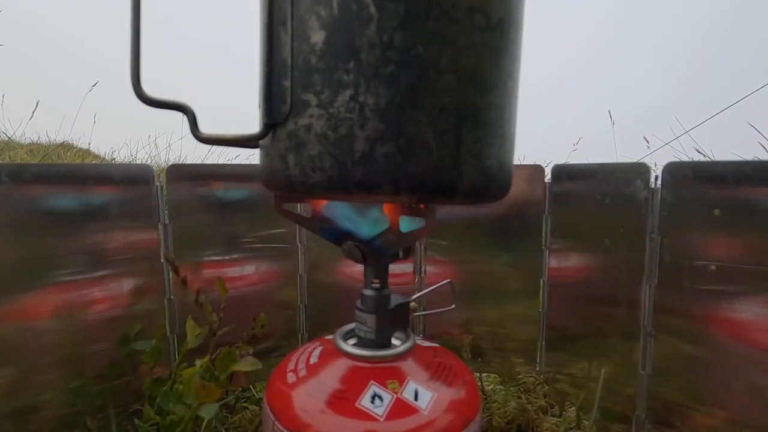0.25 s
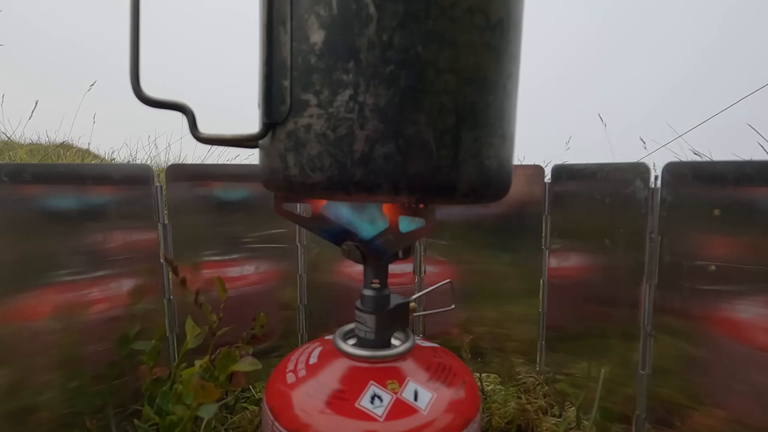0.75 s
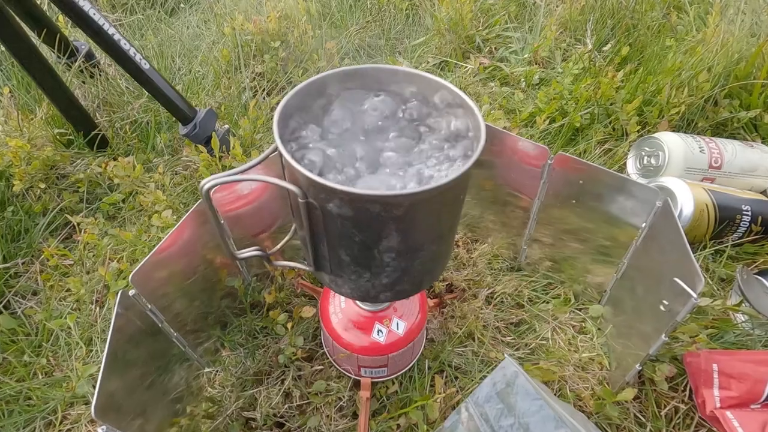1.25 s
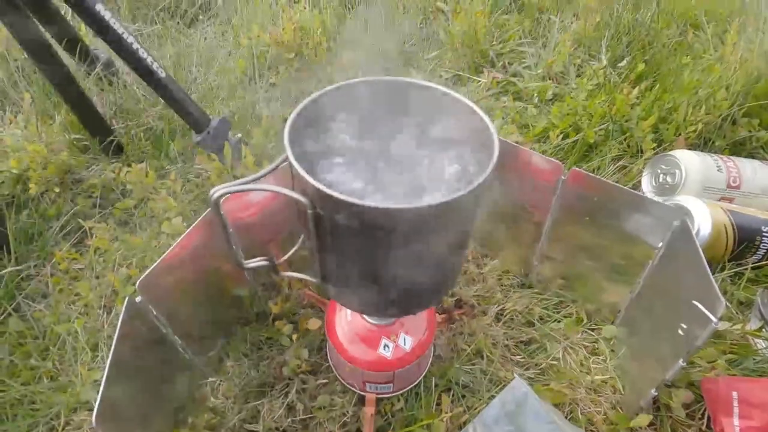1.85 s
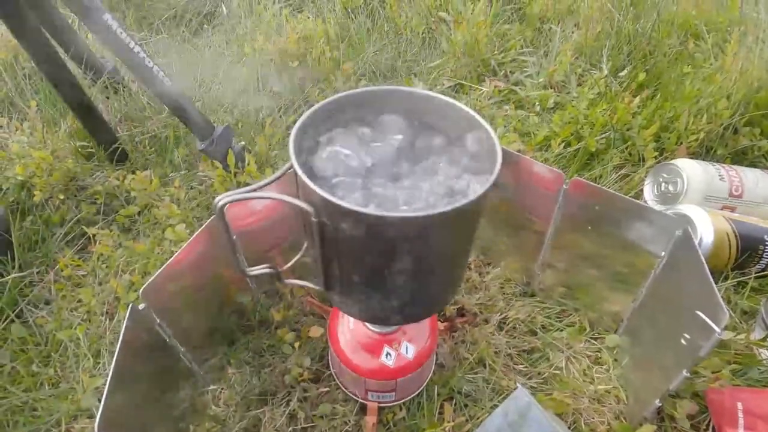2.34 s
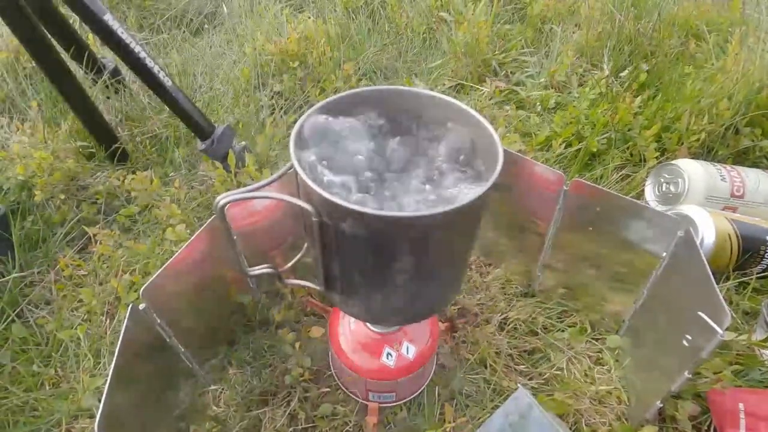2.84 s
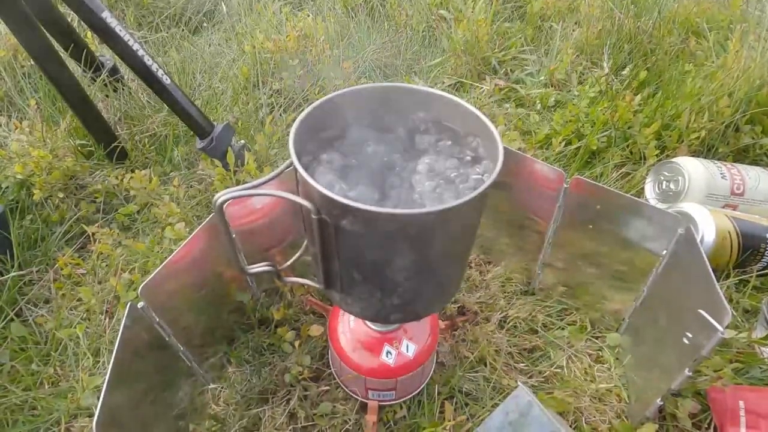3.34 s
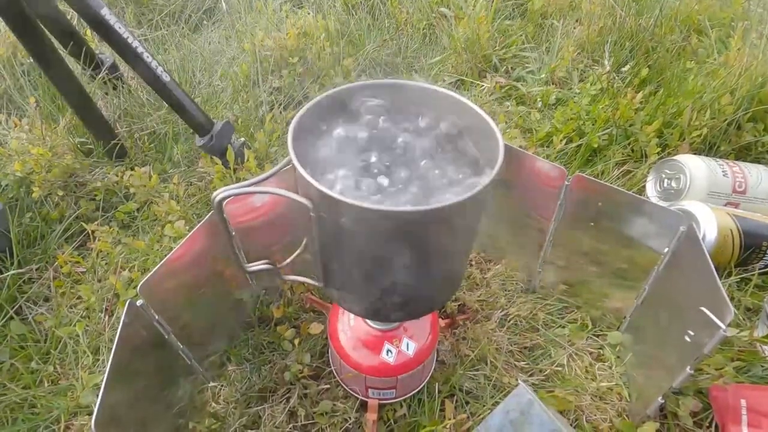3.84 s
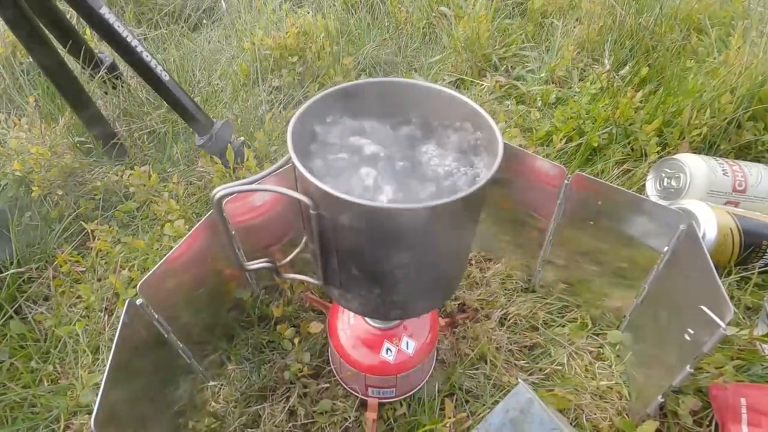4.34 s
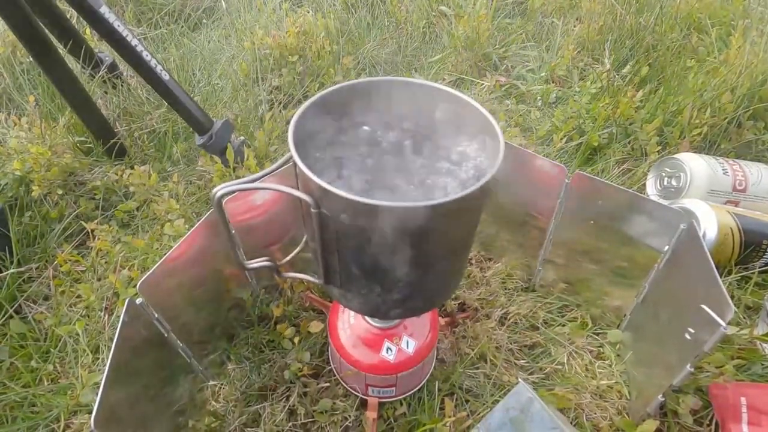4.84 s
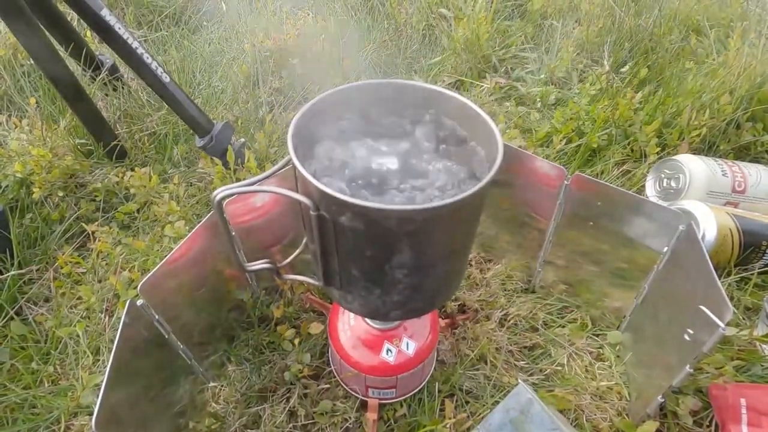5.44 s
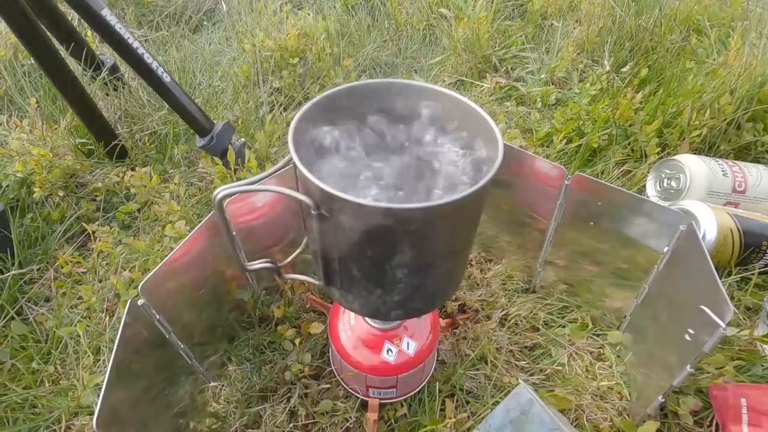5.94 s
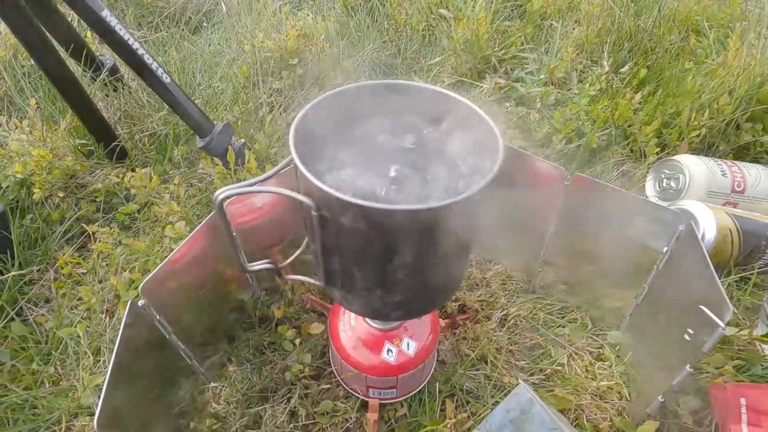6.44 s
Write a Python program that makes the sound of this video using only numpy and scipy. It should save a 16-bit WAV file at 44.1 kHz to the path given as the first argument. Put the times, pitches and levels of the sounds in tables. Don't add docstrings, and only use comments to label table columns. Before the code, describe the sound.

Close gas flame roar and hiss stop abruptly, then slowly rise again over bubbling water, with wind knocking the roar out twice.

```python
import sys
import numpy as np
from scipy import signal
from scipy.fft import rfft, irfft, next_fast_len
from scipy.io import wavfile

SR = 44100
rng = np.random.default_rng(int(sys.argv[2]) if len(sys.argv) > 2 else 0)


def wav_out(sig):
    wavfile.write(sys.argv[1], SR, np.round(np.clip(np.atleast_2d(sig).T, -1, 1) * 32767).astype(np.int16))


def rack_gain(trim_db):
    fader = np.asarray(trim_db, float)
    return 10 ** (fader / 20)


N = 294588
CUT_S, CUT_TAIL_S, RETURN_S = 1.2055, 0.0081, 1.29
RUMBLE_TOP_HZ = 337


def table(rows, at, scale=np.asarray):
    first, *columns = np.transpose(rows)
    return [np.interp(scale(at), scale(first), column) for column in columns]


def rms_one(x):
    return x / np.sqrt(np.mean(x ** 2) + 1e-20)


def drift(size, rate_hz):
    points = rng.standard_normal(int(size / SR * rate_hz * 2) + 4)
    smooth = rms_one(signal.resample(points, size // 32 + 2))
    return np.interp(np.arange(size) / 32, np.arange(len(smooth)), smooth)


def turbulence(size, colour, low_hz, high_hz, side, lean, flicker_db, patchy_db, count):
    padded = next_fast_len(size)
    hz = np.maximum(np.arange(padded // 2 + 1) * SR / padded, 1)
    level_db = table(colour, hz, np.log)[0] - 200 * (hz > colour[-1][0])
    mid, other = rfft(rng.standard_normal((2, padded))) * rack_gain(level_db)
    tilt = np.tanh(table(lean, hz, np.log)[0] * np.log(10) / 40)
    apart = rack_gain(table(side, hz, np.log)[0]) * other + tilt * mid
    place = (count + 1) * np.log(hz / low_hz) / np.log(high_hz / low_hz)
    together_db = flicker_db * (drift(size, 7.0) + 1.23 * drift(size, 45.0))
    out = 0
    for k in range(1, count + 1):
        window = np.cos(np.pi / 2 * np.clip(place - k, -1, 1)) ** 2
        band = irfft(np.array([mid, apart]) * window, padded)[:, :size]
        out = out + band * rack_gain(together_db + patchy_db * drift(size, 14.0))
    return out / np.sqrt(np.mean(out[0] ** 2))


def narrow_noise(hz, width_hz):
    low = signal.butter(2, width_hz / 2, fs=SR, output="sos")
    slow = signal.sosfilt(low, rng.standard_normal((2, 2, len(hz))))
    phase = 2 * np.pi * np.cumsum(hz) / SR
    mid, apart = slow[0] * np.cos(phase) + slow[1] * np.sin(phase)
    return np.array([rms_one(mid), rms_one(apart) * rack_gain(-10.0)])


def through(x, shield):
    padded = next_fast_len(N)
    hz = np.arange(padded // 2 + 1) * SR / padded
    level_db = sum(peak_db * np.exp(-((hz - at_hz) / width_hz) ** 2) for at_hz, width_hz, peak_db in shield)
    return irfft(rfft(x, padded) * rack_gain(level_db), padded)[:, :N]


# start t/s, length t/s, loss of
# roar level/dB, loss of rumble as a multiple of that
GUSTS = [(1.597, .08, 11, 0.16), (1.73, .1, 8, 0.2), (1.82, .1, 8, .5), (2.915, .03, 8, 0.36),
         (2.975, .015, 11, .1), (3.017, 0.21, 19.5, 0.24), (3.153, .07, 3, 1.7), (3.35, .02, 2.5, 1.4),
         (3.625, 0.0301, 2, 4.0), (4.309, .03, 3.5, 0), (4.538, .025, 14.5, 0.18), (4.608, 0.016, 6.5, 0.2),
         (4.729, .19, 26, 0.51), (4.988, .035, 23.5, 0.56), (5.05, 0.044, 10, 0), (5.11, .09, 11.5, 0.12),
         (5.155, .04, 0.5, 3.0), (5.374, .03, .5, 9.0), (5.674, .06, 3, 0.4)]


def flame_bend():
    attack_s, release_s, edge_per_length, settle_s = 0.023, 0.027, 0.17, .09
    t, roar, rumble = np.arange(N) / SR, 0, 0
    for s, length_s, loss_db, share in GUSTS:
        edge_s = edge_per_length * length_s
        corners = np.cumsum([s - attack_s, attack_s + edge_s, length_s - edge_s * .99, release_s + edge_s])
        bent = loss_db * np.interp(t, corners, [0, 1, 1, 0])
        roar, rumble = roar + bent, rumble + share * bent
    r = np.exp(-1 / (settle_s * SR))
    return roar, rumble, signal.lfilter([1 - r], [1, -r], roar)


# t/s, level/dB
FLAME = [(0.0, -24.5), (1.2, -24.5), (1.29, -84), (1.33, -65), (1.53, -44.5), (2.07, -44.5), (2.88, -39),
         (3.41, -33.5), (3.7, -31.5), (4.3, -30), (5.45, -27.5), (6.15, -27.5), (6.68, -28)]
# t/s, level/dB
JET = [(1.3, 2), (1.53, -1), (2.0, 0.5), (2.4, 0.5), (2.9, 1.5), (3.3, 0.5), (3.5, 2), (3.8, 0), (4.4, .5),
       (4.68, -0.5), (5.2, 1), (5.5, 2.5), (5.9, 3.5), (6.1, 5), (6.3, 3.5), (6.68, 4)]


def follower(rule):
    offset_db, growth, sudden, lingering, blown = rule
    reference_db = -25.5
    t, (roar, _, slow) = np.arange(N) / SR, flame_bend()
    grown_db = growth * (table(FLAME, t)[0] - reference_db) + blown * table(JET, t)[0]
    return reference_db + offset_db + grown_db - sudden * roar - lingering * slow


def burner(levels_db, start, stop, flame, jet, side, lean):
    size = stop - start
    rumble_db, roar_db, hiss_db = np.array(levels_db)[:, start:stop]
    place = (side, lean)
    rumble = turbulence(size, flame, 66.2, RUMBLE_TOP_HZ * 1.258, *place, flicker_db=0.59, patchy_db=1.5, count=3)
    roar = turbulence(size, flame, RUMBLE_TOP_HZ * 0.76, 2010, *place, flicker_db=0.22, patchy_db=-0.47, count=4)
    hiss = turbulence(size, jet, 1260, 17800, *place, flicker_db=0.49, patchy_db=0.76, count=10)
    out = np.zeros((2, N))
    out[:, start:stop] = rack_gain(rumble_db) * rumble + rack_gain(roar_db) * roar + rack_gain(hiss_db) * hiss
    return out


# f/Hz, level/dB (per Hz)
BESIDE_FLAME = [(12, -67), (20, -21.5), (36, -23), (50, -11.5), (138, -5), (190, -4), (370, -6),
                (578, -10.5), (779, -12), (992, -7), (1190, -13), (1490, -25.5), (1700, -18), (2210, -45.5),
                (3740, -120)]
BESIDE_JET = [(850, -37.5), (1450, -8), (1880, 2), (2870, -7), (4400, -9), (5310, -11.5), (6220, -0.5),
              (7900, -1), (8720, -3), (9440, -15.5), (10900, -23), (13900, -24.5), (15500, -27)]
# f/Hz, level/dB
BESIDE_SIDE = [(60, -29.5), (130, -39.5), (290, -24.5), (640, -26.5), (1410, -23), (3100, -8.5),
               (6820, -12.5), (15000, -4.5)]
# f/Hz, level/dB
BESIDE_LEAN = [(60, 1.5), (180, -0.5), (550, -2), (1650, 1.5), (4970, 0), (15000, 8)]
# f/Hz, width f/Hz, level/dB
BESIDE_SHIELD = [(1550, 150, -5.5), (4440, 260, 3), (6440, 190, 1.5), (7300, 86, -10), (7700, 420, 2.5),
                 (8740, 185, -19.5), (9260, 290, 10), (10050, 140, 7.5), (11800, 300, 5), (14300, 250, -3)]


def burner_beside():
    flame_db = table(FLAME[:2], np.arange(N) / SR)[0]
    hiss_db = flame_db - 3.5 + 1.5 * np.arange(N) / SR
    levels_db = flame_db + 2.5, flame_db, hiss_db
    end = round((CUT_S + CUT_TAIL_S) * SR)
    out = burner(levels_db, 0, end, BESIDE_FLAME, BESIDE_JET, BESIDE_SIDE, BESIDE_LEAN)
    return through(out, BESIDE_SHIELD)


# f/Hz, level/dB (per Hz)
ABOVE_FLAME = [(12, -53), (20, -33.5), (32, -16.5), (65, 0), (103, -9.5), (166, 1), (302, -3), (384, -12.5),
               (635, -8.5), (1010, -8.5), (1150, -13.5), (1470, -29), (1700, -45), (2210, -47),
               (3740, -120)]
ABOVE_JET = [(850, -38), (1450, -4), (1730, 2), (2400, -3.5), (2820, -6), (3720, -1), (5420, -8.5),
             (6290, -6.5), (7150, -9), (9820, -18), (10600, -24.5), (14000, -28.5), (15500, -48)]
# f/Hz, level/dB
ABOVE_SIDE = [(60, 4), (130, -48), (290, -18.5), (640, -51), (1410, -18.5), (3100, -13), (6820, -14),
              (15000, 1.5)]
# f/Hz, level/dB
ABOVE_LEAN = [(60, -0.59), (180, 0.0027), (550, -1.06), (1650, -0.35), (4970, 0.0), (15000, 0.92)]
# offset level/dB, growth per dB of flame, share of sudden loss, of lingering loss, growth per dB of jet
HISS = (-13, 1.0, 0.58, .35, 1.0)


def burner_above():
    roar_loss_db, rumble_loss_db, _ = flame_bend()
    rumble_db = follower((0.87, 0.96, 0, 0, 0)) - rumble_loss_db
    roar_db = table(FLAME, np.arange(N) / SR)[0] - roar_loss_db
    levels_db = rumble_db, roar_db, follower(HISS)
    return burner(levels_db, round(RETURN_S * SR), N, ABOVE_FLAME, ABOVE_JET, ABOVE_SIDE, ABOVE_LEAN)


# offset level/dB, growth per dB of flame, share of sudden loss, of lingering loss, growth per dB of jet
LOW_MODE = (-20.5, 1.0, 0.06, 0.67, 1.92)
HIGH_MODE = (-28.5, 1.0, -0.24, 0.13, 1.87)
# mode (0 low, 1 high), pitch ratio, width f/Hz, level/dB, waver level/dB
STRANDS = [(0, .995, 420, -2, 2.0), (0, 1.2, 340, -13, 2.5), (1, .945, 330, -9, 5),
           (1, 1.002, 380, -4.5, 2), (1, 1.065, 380, -6, 3.5)]


def tube_modes():
    modes_hz, rise, full_bend_db = (6310, 9020), (.11, .045), 7
    levels_db, bent_db = (follower(LOW_MODE), follower(HIGH_MODE)), flame_bend()[2]
    bend = np.tanh((bent_db / full_bend_db) ** 2)
    out = 0
    for mode, ratio, width_hz, level_db, waver_db in STRANDS:
        k = int(mode > .5)
        hz = modes_hz[k] * (1 + rise[k] * bend) * ratio * (1 + .008 * drift(N, 3.0))
        strand_db = levels_db[k] + level_db + waver_db * drift(N, 9.0)
        out = out + rack_gain(strand_db) * narrow_noise(hz, width_hz)
    return out * (np.arange(N) > RETURN_S * SR)


# t/s, level/dB
BARE_JET = [
    [(1.5, -82), (1.65, -76), (1.85, -74), (2.05, -87)],
    [(2.84, -75), (2.934, -74), (3.076, -60), (3.25, -56.5), (3.34, -76)],
    [(4.48, -81), (4.768, -51.5), (4.894, -51.5), (4.952, -52), (5.028, -52), (5.184, -52), (5.36, -62)],
]
# f/Hz, level/dB (per Hz)
BARE_COLOUR = [(500, -14), (1000, 6), (1450, -7.5), (2200, -1), (3900, -5), (5500, -0.5), (7000, -4),
               (9500, -4), (12500, -5), (14500, -10), (15600, -25)]
# t/s, level/dB, f/Hz, width f/Hz, length t/s
PUFFS = [(2.925, -60, 10500, 900, 0.032), (2.975, -64, 11000, 1200, .015), (3.042, -59, 12200, 1500, .02),
         (3.128, -57.5, 12300, 1386, 0.034), (3.17, -55, 12400, 1500, 0.047),
         (3.225, -62, 12200, 1490, 0.026), (4.554, -55, 12000, 1500, .02), (4.765, -47, 12300, 1310, 0.052),
         (4.822, -43.5, 12100, 1400, 0.044), (4.896, -49, 12800, 1200, .03),
         (4.966, -47.5, 10400, 700, 0.0392), (5.008, -42.5, 12400, 1800, 0.027),
         (5.048, -47, 11000, 900, 0.039), (5.126, -53, 12300, 1200, 0.048), (5.131, -47, 9850, 800, 0.037)]


def bare_jet():
    out = np.zeros((2, N))
    for rows in BARE_JET:
        start, stop = round(rows[0][0] * SR), round(rows[-1][0] * SR)
        jet = turbulence(stop - start, BARE_COLOUR, 600, 19000, ABOVE_SIDE, ABOVE_LEAN,
                         flicker_db=1.2, patchy_db=2.2, count=10)
        fade = signal.windows.tukey(stop - start, .25)
        level_db = table(rows, np.arange(start, stop) / SR)[0] + 5.0
        out[:, start:stop] += jet * fade * rack_gain(level_db)
    t = np.arange(-4000, 4000) / SR
    for s, level_db, pitch_hz, width_hz, length_s in PUFFS:
        puff = narrow_noise(np.full(len(t), pitch_hz), width_hz) * np.exp(-(2 * t / length_s) ** 2)
        out[:, round((s + t[0]) * SR):][:, :len(t)] += rack_gain(level_db) * puff
    return out


# f/Hz, width f/Hz, level/dB
ABOVE_SHIELD = [(1693, 124, 4), (2400, 150, -0.5), (3690, 340, 2.5), (6800, 290, 0), (7940, 160, -4),
                (9130, 110, 0), (9800, 300, -0.5), (12200, 900, 2),
                (5540, 170, -3)]


def above_mug():
    return through(burner_above() + tube_modes() + bare_jet(), ABOVE_SHIELD)


def bursts(rows):
    out, t = np.zeros(N + 600), np.arange(600) / SR
    for s, peak_db, pitch_hz in rows:
        cycles = t * pitch_hz
        envelope = cycles * np.exp(1.4 - 1.77 * cycles)
        tick = np.sin(2 * np.pi * cycles * (1 + 0.051 * cycles)) * envelope
        out[round(s * SR):][:len(t)] += rack_gain(peak_db) * tick
    return out[:N]


# t/s, peak level/dB, f/Hz
SPITS = [(1.512, -54, 3760), (1.688, -46, 2800), (2.948, -33, 2300), (2.979, -36, 2300), (3.052, -42, 2100),
         (3.238, -41, 2800), (3.25, -40, 1895), (3.348, -43, 2006), (4.6, -33, 4000), (4.873, -31, 3200),
         (2.962, -28, 880),
         (6.0725, -20, 3600),
    (6.0726, -20, 5600),
]


def spits():
    return bursts(SPITS)


# t/s, level/dB
BOIL = [(1.3, -75), (1.6, -63), (3.0, -44), (4.8, -48), (6.68, -41)]


def boil(count=260):
    when, size, pitch = rng.random((count, 3)).T
    s = BOIL[0][0] + when * (N / SR - BOIL[0][0])
    peak_db = table(BOIL, s)[0] - 3.3 * np.log(size + .04) - 5.5
    return bursts(zip(s, peak_db, 1100 * 4.2 ** pitch))


# t/s, level/dB (over calm)
SWELLS = [(0.01, 14), (.15, 9.7), (.95, 7.5), (2.0, 7.3), (2.95, 11), (3.33, 12), (3.8, 5.6), (4.04, 9.9),
          (4.5, 5.7), (4.68, 9.4), (4.96, 14.3), (5.13, 11), (5.96, 5.6), (6.45, 5.5)]


def breeze():
    t, swell_s = np.arange(N) / SR, 0.062
    calm_db = follower((-14, 0.9, 0, 0, 0))
    level_db = calm_db + sum(db * np.exp(-((t - s) / swell_s) ** 2) for s, db in SWELLS)
    band = signal.butter(2, [42, 106], "band", fs=SR, output="sos")
    return rack_gain(level_db) * rms_one(signal.sosfilt(band, rng.standard_normal(N)))


def scene():
    mid, apart = burner_beside() + above_mug()
    mid = mid + spits() + boil() + breeze()
    return np.array([mid + apart, mid - apart])


def tiles(share, hz, s):
    chance = rng.random((80, len(s) // 2 + 1))
    row, column = (np.sqrt(hz) / 2.2).astype(int), np.arange(len(s)) // 2
    return chance[row][:, column] < share


def steps(rows, hz):
    edges, shares = np.transpose(rows)
    return np.append(shares, 0)[np.searchsorted(edges, hz)][:, None]


# up to f/Hz,
# share 0-1
KEPT_BESIDE = [(900, .97), (2000, .6), (6100, .98), (6800, .3), (7600, .97), (8900, .15), (9600, .9),
               (14000, .45)]
KEPT_QUIET = [(11000, 0), (15700, 1)]
KEPT_MIDDLE = [(1100, .1), (6900, .8), (14300, .25)]
KEPT_LOUD = [(300, .4), (6300, .97), (6900, .1), (14300, .28)]
# t/s, length t/s
FLASHES = [(1.75, .04), (1.86, .04), (2.06, .04), (2.18, .16), (3.0, .07), (3.38, .06), (6.0, .14)]


def stereo_share(hz, s):
    quiet_until_s, middle_from_s, loud_from_s = 3.4, 3.87, 5.3
    spans = [s < RETURN_S, s > loud_from_s, s > middle_from_s, s < quiet_until_s + 0 * hz[:, None]]
    shares = [steps(rows, hz) for rows in (KEPT_BESIDE, KEPT_LOUD, KEPT_MIDDLE, KEPT_QUIET)]
    kept = np.select(spans, shares, .2 * (hz[:, None] > 7000))
    flash = sum((s >= at) & (s < at + length) for at, length in FLASHES)
    return np.maximum(kept, .8 * np.outer(hz > 1500, flash))


# up to f/Hz, share 0-1
DROPPED = [(7200, 0), (9700, .05), (11100, .09), (13900, .03), (14750, .15), (15100, .85), (16500, .97)]
# t/s, length t/s, low f/Hz, high f/Hz
GAPS = [(3.55, .08, 8500, 10100), (4.42, .07, 9000, 11000)]


def treble_loss(hz, s):
    faint_until_s, quiet_until_s = 2.05, 3.4
    bent = (np.interp(s * SR, np.arange(N), flame_bend()[2]) > 9) & (s > faint_until_s)
    calm = np.outer(hz < 14000, (s > RETURN_S) & (s < quiet_until_s))
    top_hz = np.minimum(9800 + 9000 * (s - RETURN_S), 12600)
    faint = .8 * (hz[:, None] > top_hz) * (s > RETURN_S) * (s < faint_until_s)
    for at, length, low, high in GAPS:
        faint = faint + np.outer((hz > low) & (hz < high), (s > at) & (s < at + length))
    return steps(DROPPED, hz) * ~bent * ~calm + faint


def low_pass(x):
    return signal.sosfilt(signal.butter(12, 15640, fs=SR, output="sos"), x)


def record(dry):
    hz, s, (left, right) = signal.stft(dry, SR, nperseg=2048, noverlap=1024)
    coarse_db = 1.8 * rng.standard_normal((len(hz) // 4 + 1, len(s))).repeat(4, axis=0)[:len(hz)]
    coarse = rack_gain(coarse_db * np.clip(hz / 7000, 0, 1)[:, None])
    mid = (left + right) / 2 * ~tiles(treble_loss(hz, s), hz, s) * coarse
    apart = (left - right) / 2 * tiles(stereo_share(hz, s), hz, s) * coarse
    out = signal.istft(np.array([mid + apart, mid - apart]), SR, nperseg=2048, noverlap=1024)[1][:, :N]
    cut, tail_end, back = round(CUT_S * SR), round((CUT_S + CUT_TAIL_S) * SR), round(RETURN_S * SR)
    out[:, cut:back] *= rack_gain(-69)
    out[:, tail_end:back] = 0
    out[:, back:][:, :1200] *= np.linspace(0, 1, 1200)
    return low_pass(out)


dry = scene()
out = record(dry)
wav_out(out)
```